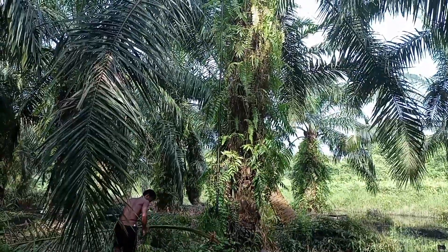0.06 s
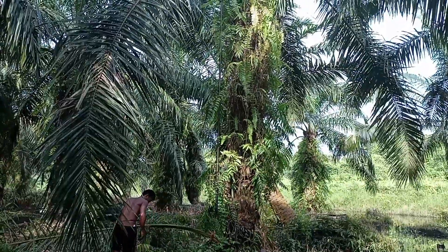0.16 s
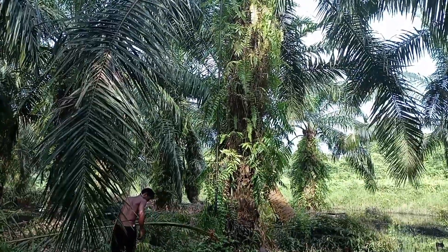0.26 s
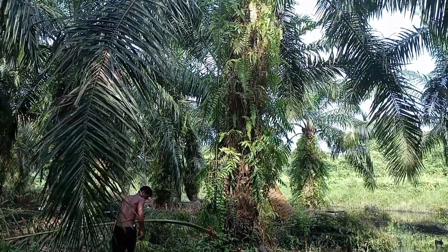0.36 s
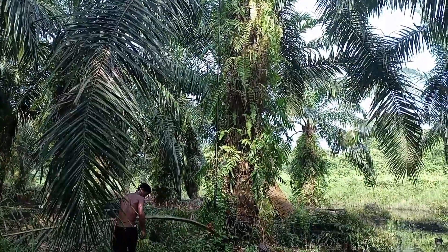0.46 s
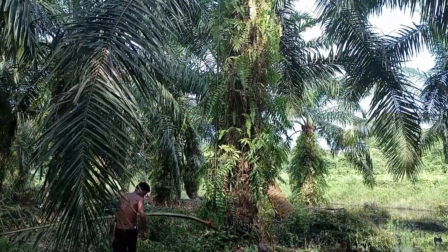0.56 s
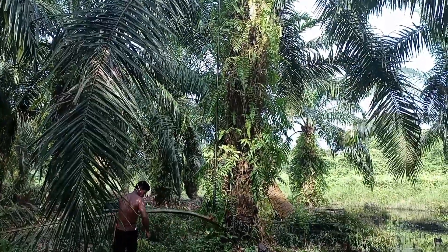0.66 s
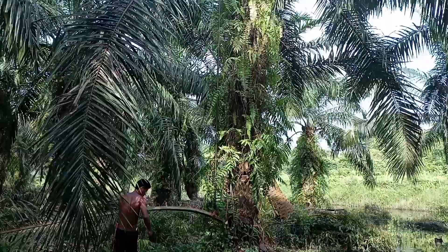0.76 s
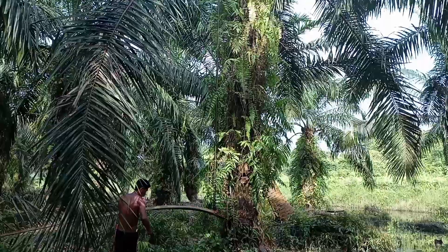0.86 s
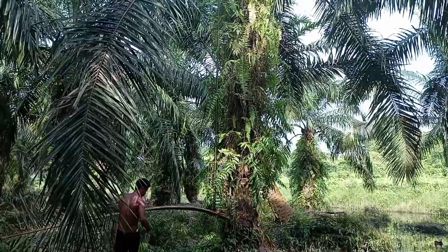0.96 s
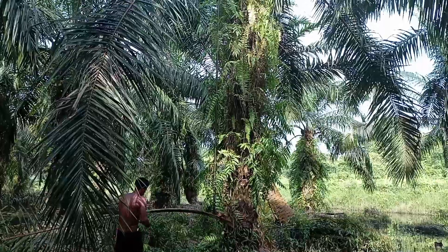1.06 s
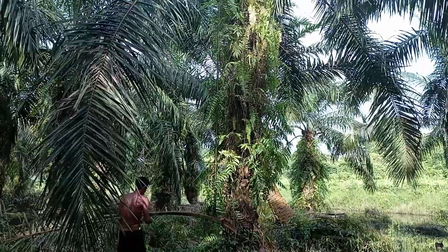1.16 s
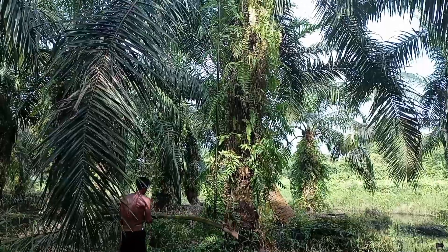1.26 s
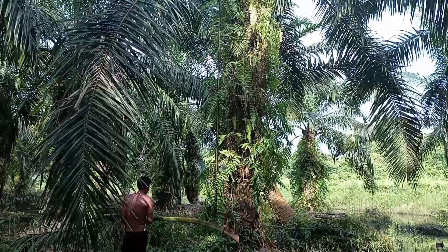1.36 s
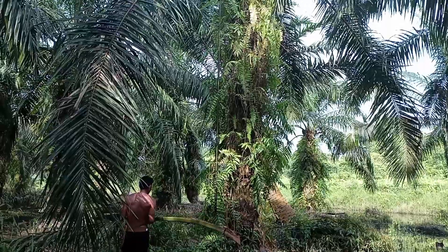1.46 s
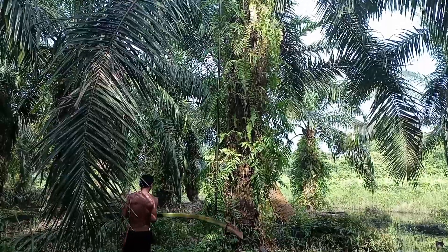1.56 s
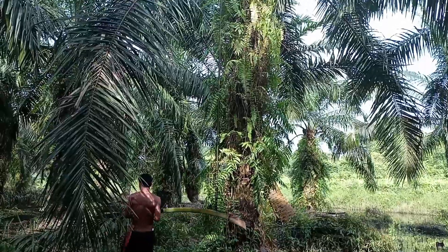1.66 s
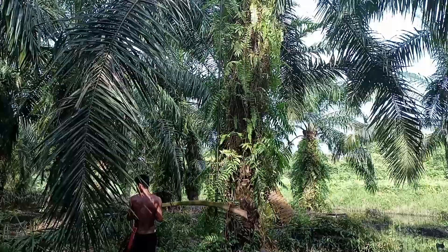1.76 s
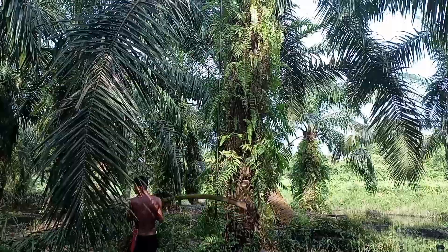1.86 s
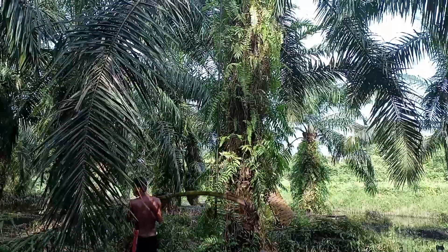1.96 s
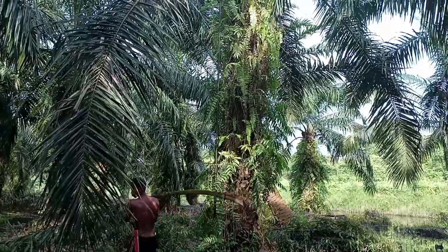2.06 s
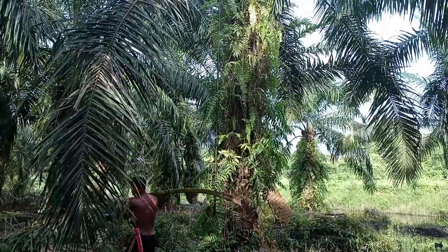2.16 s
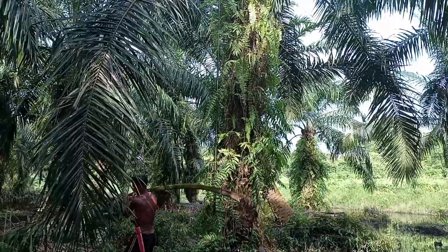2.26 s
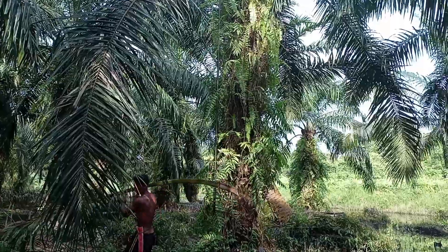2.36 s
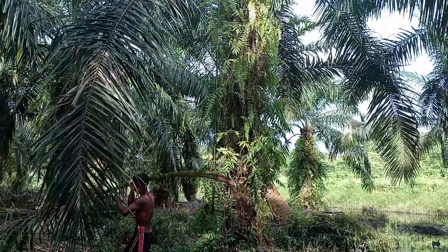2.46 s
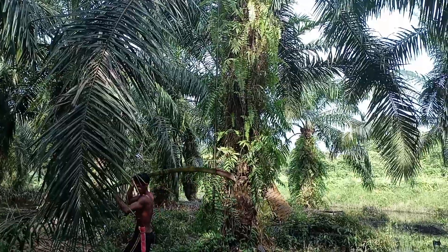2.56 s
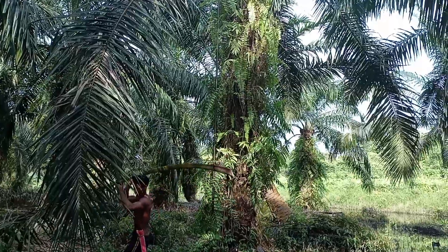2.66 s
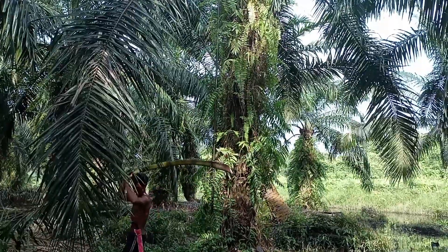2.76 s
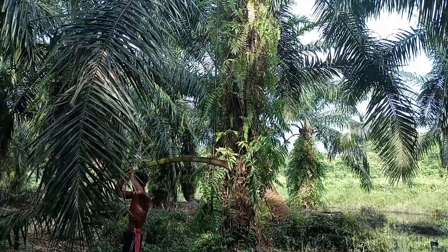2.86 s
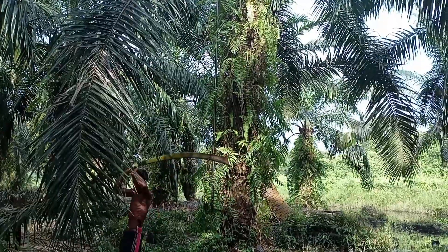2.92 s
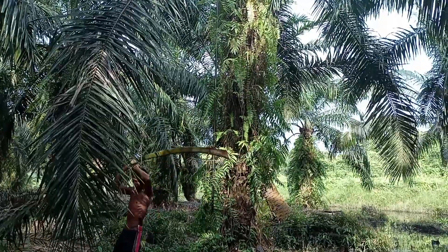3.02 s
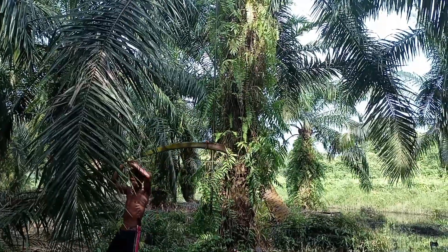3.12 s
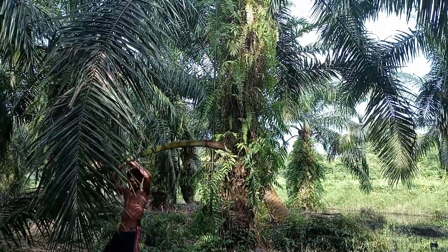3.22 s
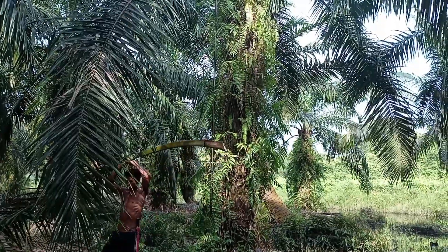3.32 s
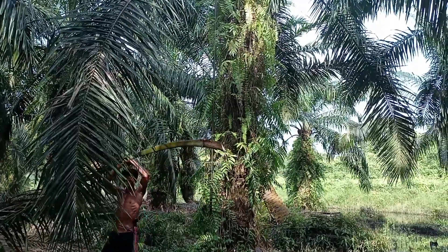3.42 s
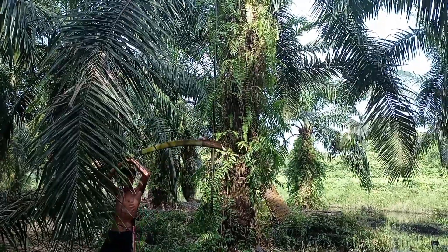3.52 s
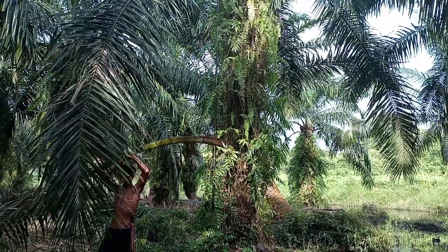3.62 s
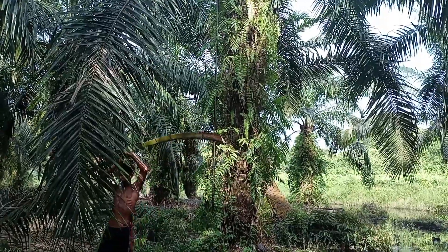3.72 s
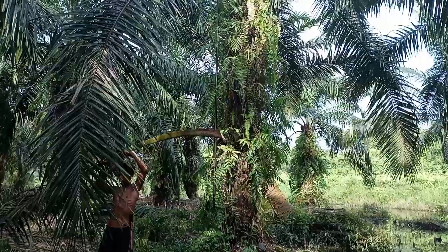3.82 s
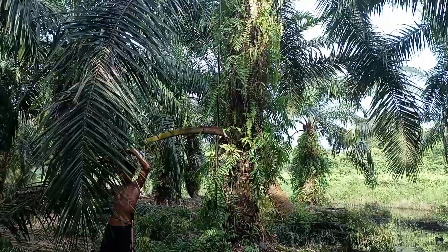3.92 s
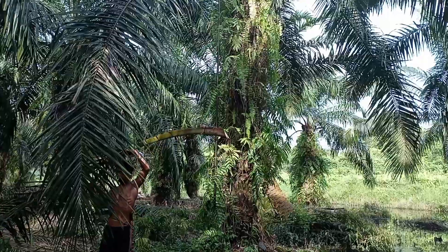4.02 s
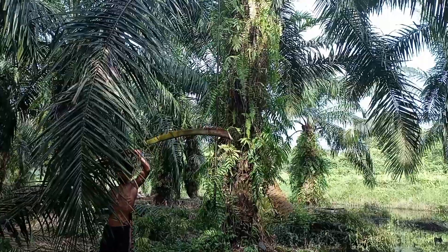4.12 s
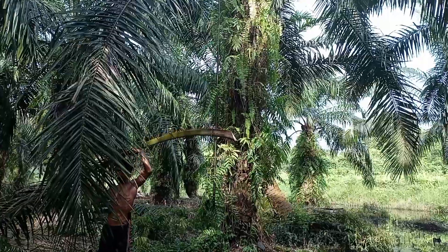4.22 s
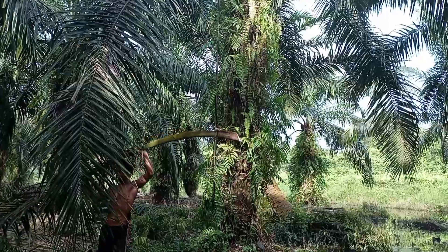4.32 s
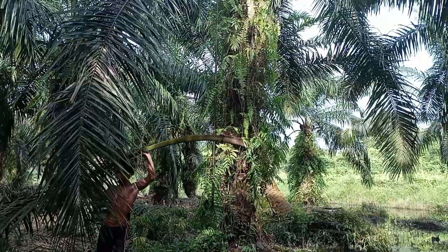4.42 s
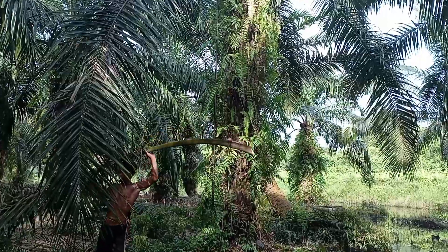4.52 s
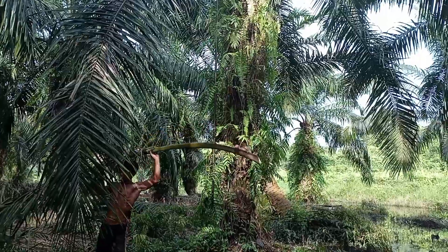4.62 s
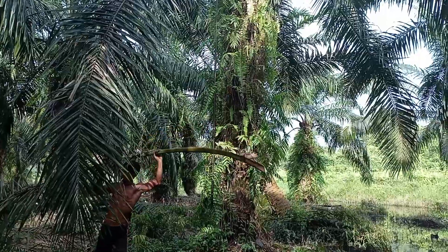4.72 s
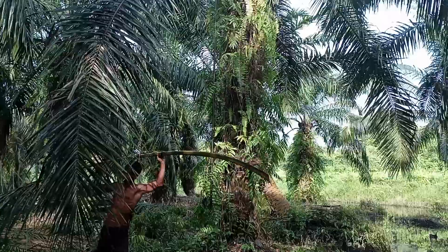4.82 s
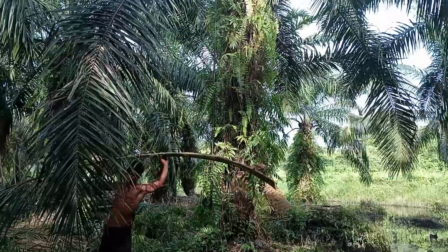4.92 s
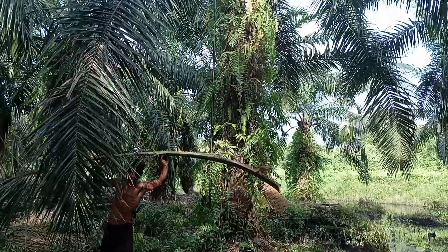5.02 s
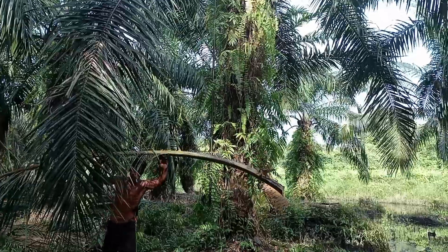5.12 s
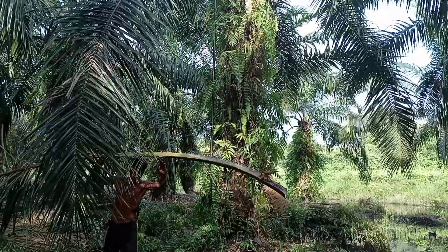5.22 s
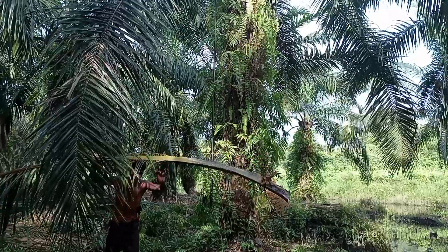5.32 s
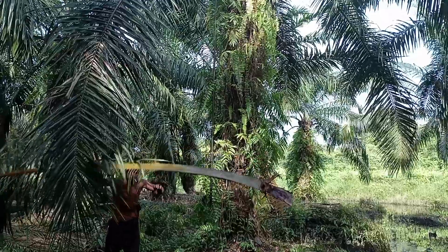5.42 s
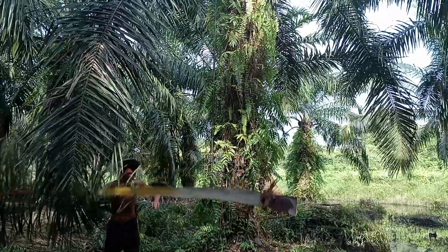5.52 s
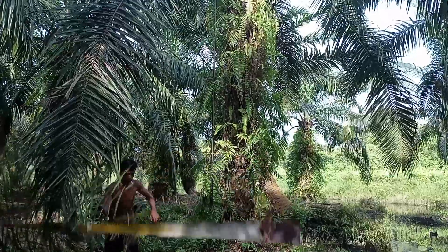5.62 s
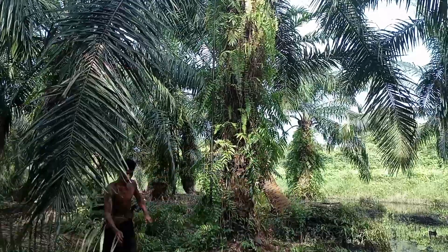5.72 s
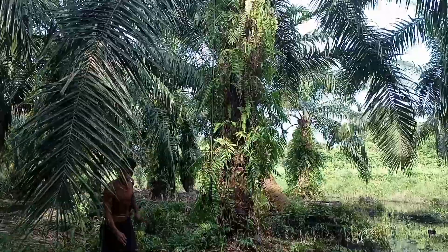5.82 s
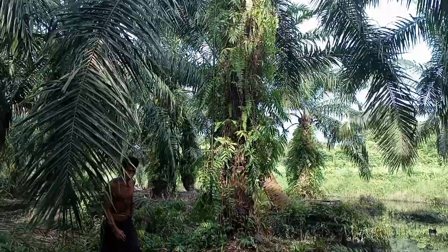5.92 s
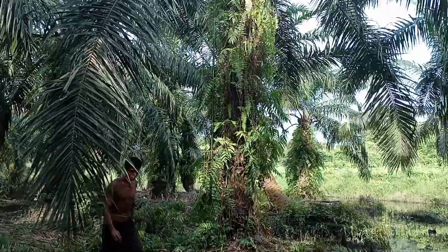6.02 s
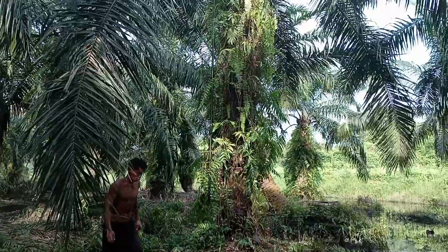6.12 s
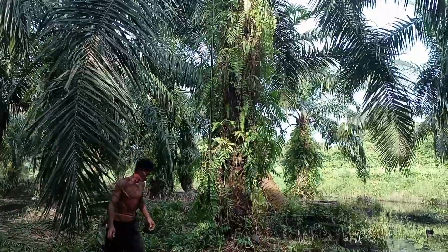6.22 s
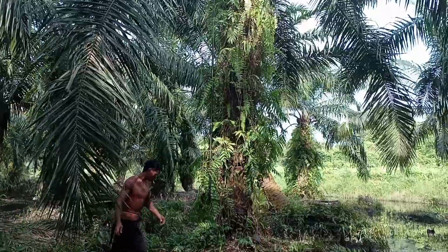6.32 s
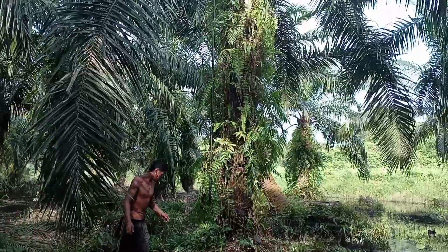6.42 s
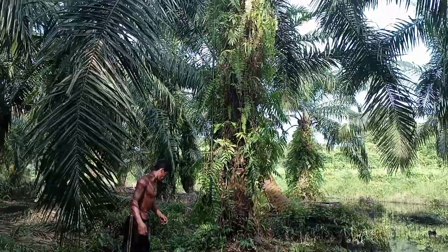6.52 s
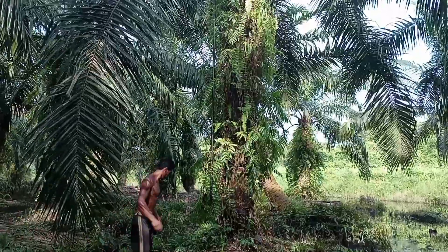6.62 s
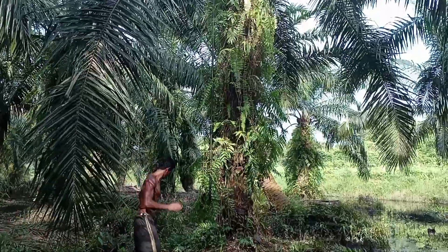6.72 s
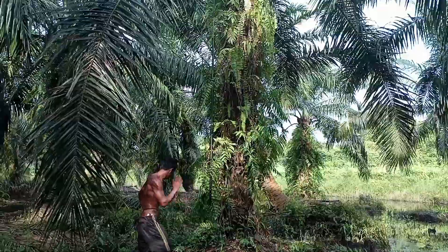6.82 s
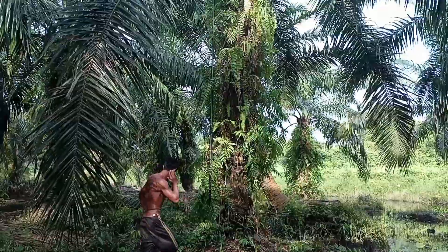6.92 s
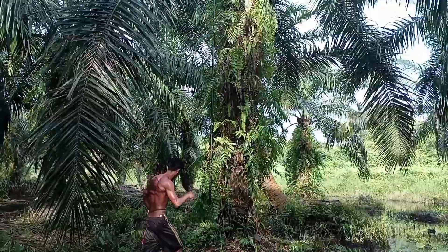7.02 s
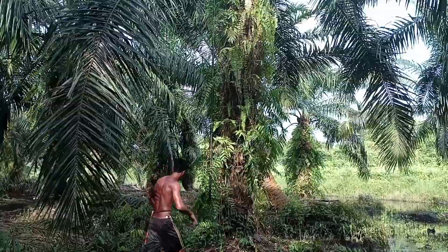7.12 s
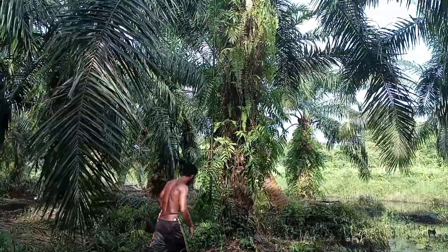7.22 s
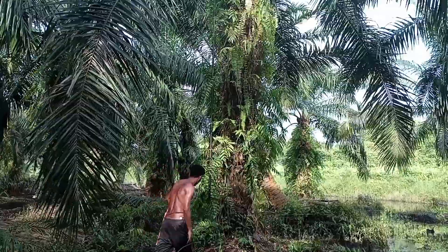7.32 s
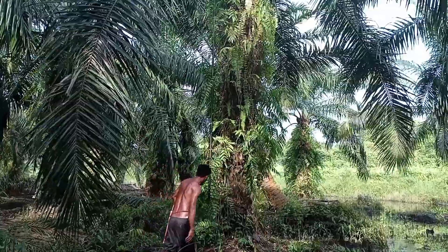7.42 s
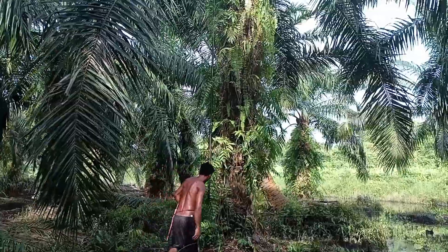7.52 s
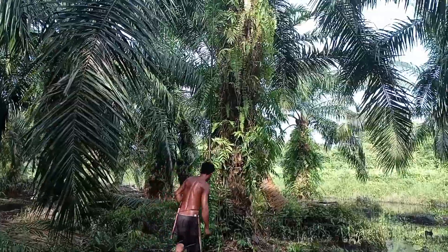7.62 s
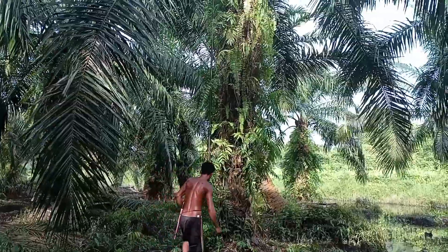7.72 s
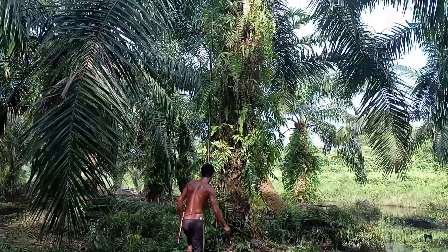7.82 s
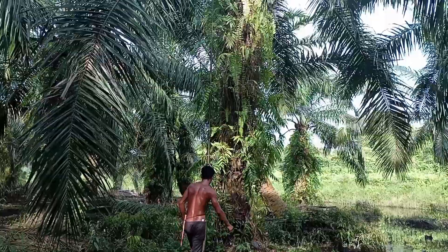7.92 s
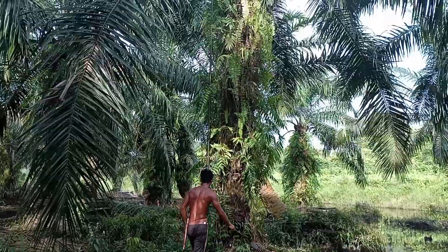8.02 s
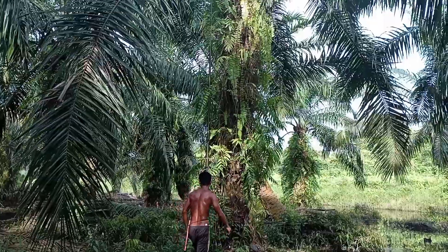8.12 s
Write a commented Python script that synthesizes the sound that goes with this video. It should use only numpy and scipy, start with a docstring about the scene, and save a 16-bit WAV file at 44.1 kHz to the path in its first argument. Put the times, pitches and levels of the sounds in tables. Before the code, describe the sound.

A worker drags and throws a big palm frond; leaflets rustle, twigs snap, it slams down crackling, amid steady insect hiss.

```python
"""Leaflets rustle, leaflets and twigs snap, a stalk knocks; a palm frond rushes down, cracks and thuds.
A worker in a plantation lifts the cut frond and throws it; insects hiss and an engine hums far away.
Leaves, air and insects are coloured noise and crackle; snaps and cracks are dying bursts of fractures.
Knocks ring damped modes of the stalk, thuds are low decaying swings, the engine is a few wandering tones.
"""
import sys
import numpy as np
from scipy import signal
from scipy.fft import rfft, irfft, next_fast_len
from scipy.io import wavfile

SR = 44100
rng = np.random.default_rng(int(sys.argv[2]) if len(sys.argv) > 2 else 0)


def transcribe(signal):
    """Save signal, clipped to [-1, 1], as a 16-bit WAV file at the path in sys.argv[1]."""
    frames = np.atleast_2d(signal).T
    limited = np.clip(frames, -1, 1)
    pcm = np.round(limited * 32767).astype(np.int16)
    wavfile.write(sys.argv[1], SR, pcm)


N = 360287
T = np.arange(N) / SR

# leaflets rubbing or slapping: (frequency [Hz], relative density [dB])
LEAF_SPECTRUM = [(150, -24), (600, -8.5), (1400, -6), (2400, 0.5), (4500, 4), (6500, 4.5), (9500, 6.5),
                 (12000, -21), (16000, 0)]
# crisp top of rubbing, snaps and cracks: (frequency [Hz], relative density [dB])
CRISP_SPECTRUM = [(500, -49), (4000, -21), (6500, -8), (8000, -3.5), (9800, 3.5), (11500, -4),
                  (13500, -8.5), (16000, -17.5)]
LANDING_S = 5.9225


def amp(db):
    """Decibels to gain."""
    return 10 ** (np.asarray(db) / 20)


def unit(x):
    """Scales to rms 1."""
    return x / np.sqrt(np.mean(x ** 2) + 1e-20)


def read(points, hz):
    """Reads a table on a log-frequency axis."""
    f, value = np.transpose(points)
    return np.interp(np.log(hz + 1), np.log(f + 1), value)


def since(s):
    """Seconds gone by since time s, zero before it."""
    return np.maximum(T - s, 0)


def add(mix, s, sound):
    """Mixes a sound in at time s."""
    part = mix[:, round(s * SR):][:, :sound.shape[-1]]
    part += sound[..., :part.shape[1]]


def pan(db):
    """Gains of left and right; positive favours the left."""
    return amp([[db / 2], [-db / 2]])


def drift(rate_hz):
    """Slow random motion of rms 1: noise under a Gaussian low-pass."""
    lowpass = np.exp(-(np.fft.rfftfreq(N, 1 / SR) / rate_hz) ** 2)
    return unit(irfft(rfft(rng.standard_normal(N)) * lowpass, N))


def colour(x, spectrum, size=4096):
    """Minimum-phase filter of energy 1, so that clicks keep their sharp fronts."""
    log_gain = np.log(amp(read(spectrum, abs(np.fft.fftfreq(size, 1 / SR)))))
    taps = np.fft.ifft(np.exp(np.conj(signal.hilbert(log_gain)))).real[:size // 2]
    taps /= np.linalg.norm(taps)
    return signal.oaconvolve(x, taps[None], axes=1)[:, :x.shape[1]]


def pair(x, likeness):
    """Blends two channels by frequency: long waves reach both ears more alike."""
    size = next_fast_len(x.shape[1])
    angle = np.arcsin(np.clip(read(likeness, np.fft.rfftfreq(size, 1 / SR)), 0, 1)) / 2
    z = rfft(x, size)
    return irfft(z * np.cos(angle) + z[::-1] * np.sin(angle), size)[:, :x.shape[1]]


def crackle(size, rate_hz, spread_db):
    """Random fractures of varying strength; the left ear hears each a little early, by its own delay."""
    at = np.flatnonzero(rng.random(size) < rate_hz / SR)
    strength, sign, place, side = rng.random((size, 4))[at].T
    click = amp(spread_db * np.minimum(-np.log(1 - strength), 5)) * np.sign(sign - .5)
    delay = (place * 20).astype(int)  # samples
    out = np.zeros((2, size))
    out[0, at] = click * (.5 + side)
    out[1, np.minimum(at + delay, size - 1)] = click * (1 + .5 - side)
    return unit(out)


def tear(length_s, rate_hz=11000, spread_db=1.0):
    """A dying burst of breaking fibres; a longer tear carries more energy."""
    t = T[:round(length_s * 8 * SR) + 32]
    burst = crackle(len(t), rate_hz, spread_db) * np.exp(-t / length_s)
    burst /= np.linalg.norm(burst, axis=1, keepdims=True).clip(1e-9)
    return burst * np.sqrt((0.0015 + length_s / 2) * SR)


def ticks(size, rate_hz, spread_db, low_hz=2250, high_hz=13600, count=30):
    """Single leaflets or twigs flick past each other: crackles on brief rings of many pitches."""
    t, out = T[:256], np.zeros((2, size))
    for hz, cycles in zip(np.linspace(low_hz, high_hz, count), rng.uniform(0.96, 5.2, count)):
        ring = unit(np.exp(-t * hz / cycles) * np.sin(2 * np.pi * hz * t))
        out += signal.oaconvolve(crackle(size, rate_hz, spread_db), ring[None], axes=1)[:, :size]
    return unit(out)


def background():
    """Still air and a dense insect chorus as coloured noise; a distant engine as wandering tones."""
    # still air and insect chorus: (frequency [Hz], relative density [dB])
    air_spectrum = [(20, -52.5), (45, -14), (75, -4), (140, -2), (280, -9), (500, -14.5), (1000, -24.5),
                    (2000, -21), (4400, -22), (6000, -34), (16000, -24)]
    insect_spectrum = [(4000, -51), (6300, -29), (7200, -12), (7650, -3), (8050, -1.5), (8350, -7.5),
                       (8750, -17.5), (9400, -9.5), (10000, -8.5), (10600, -17), (12000, -42), (16000, -25)]
    # likeness of the two ears for the air: (frequency [Hz], likeness [0-1])
    far_likeness = [(60, 0.46), (130, 0.37), (300, 0.15), (700, 0.15), (1500, 0.027), (15000, .05)]
    # steady engine tones: (frequency [Hz], level before swell [dB], share of swell [0-1], rms wander [Hz])
    engine_tones = [(53.2, -73, 0, 0.32), (83.3, -73, 1, 0.48), (106, -71, 0.83, 0.5), (134, -82, 0, 0.46),
                    (150.4, -79, 0.4, 0.6)]
    # the far engine swells and fades: (time [s], level change [dB])
    engine_swell = [(0, -11), (.8, -0.5), (3.4, -4.5), (4.4, 3.5), (5.6, 4), (6.8, 8.5), (7.4, 3.5),
                    (8.1, 3)]
    air = amp(-65) * pair(colour(rng.standard_normal((2, N)), air_spectrum), far_likeness)
    chorus_db = -54.5 + np.interp(T, [0, 4, 7, 8.1], [-1.5, -0.073, 0.64, 0.077])
    chorus_db += 1.17 * drift(0.91) + 0.51 * drift(60)
    insects = amp(chorus_db) * colour(rng.standard_normal((2, N)), insect_spectrum) * pan(-4.5)
    swell_db = np.interp(T, *np.transpose(engine_swell))
    engine = np.zeros(N)
    for hz, db, share, wander_hz in engine_tones:
        level_db = db + share * (swell_db + 0.88 * drift(4.8))
        phase = 2 * np.pi * np.cumsum(hz + wander_hz * drift(5.5)) / SR
        engine += amp(level_db) * np.sqrt(2) * np.sin(phase)
    return air + insects + engine


def motions():
    """Each way the leaves move, as (strength over time, crisp top [dB], dull drag [dB])."""
    # rubbing as the frond is dragged, lifted and held: (time [s], level before handling_db [dB])
    handling = [(0.0, -62), (0.31, -68.5), (0.52, -68), (0.84, -60.5), (1.39, -63.5), (1.78, -62),
                (2.22, -66.5), (2.86, -63.5), (3.05, -62), (3.22, -60), (3.70, -69.5), (3.97, -69),
                (4.63, -59), (4.96, -60), (5.15, -58.5), (5.28, -63.5), (5.5, -63.5)]
    # jerks and footsteps shake the leaves: (time [s], level [dB], fade [s], relative crisp top [dB])
    shake_events = [(0.476, -60, 0.088, 6), (.68, -57.5, 0.21, 7.5), (1.75, -56, 0.15, -1),
                    (1.865, -66.5, 0.16, 14.5), (2.188, -53, 0.06, 5.5), (2.41, -61, .03, 2),
                    (2.86, -50, 0.098, 4.5), (3.57, -59.5, 0.05, 1), (3.975, -62, 0.022, 0),
                    (4.14, -66, 0.051, 11.5), (4.465, -54.5, 0.065, -3), (5.503, -63, .06, 8),
                    (5.71, -59, 0.053, 12), (5.868, -53.5, 0.055, 12), (6.145, -53, 0.069, -2),
                    (6.29, -51, 0.023, -4), (6.37, -62, .05, 4), (6.505, -54.5, 0.06, -2),
                    (6.575, -60, 0.024, -10), (6.81, -65.5, 0.053, 3), (7.4, -61, 0.16, 1),
                    (7.535, -65, 0.065, -8), (7.81, -71, .05, -3), (8.135, -68, .08, 6)]
    handling_db, throw_s, let_go_s, flat_s, shake_rise_s = 1.2, 5.495, 0.27, 6.31, 0.011
    held = amp(np.interp(T, *np.transpose(handling)) + handling_db) * np.exp(-since(throw_s) / let_go_s)
    # the raised frond sweeps through the hanging crown, a duller swell
    lift = amp(-65) * np.exp(-((T - 4.55) / 0.47) ** 2)
    down = T >= LANDING_S
    # the rush grows with the speed of the falling frond
    rush = amp(-50) * (since(throw_s) / (LANDING_S - throw_s)) ** 0.53 * ~down
    # the lowest leaflets meet the weeds, strongest at the landing
    graze = amp(-45) * np.exp(-abs(T - LANDING_S) / .03)
    # the frond sags until it lies flat; some leaflets go on creeping
    sag = amp(-42.5 - 27 * since(LANDING_S) - 83 * since(flat_s)) * down
    creep = amp(-48 - 26.5 * since(LANDING_S)) * down
    ways = [(held, 2.5, -7.5), (lift, 0, -0.5), (rush, 7, -6),
            (graze, 2, -17), (sag, 5.5, -9.5), (creep, 4.5, -9.5)]
    for s, db, fade_s, crisp_db in shake_events:
        rise = np.minimum(since(s) / shake_rise_s, 1)
        ways.append((amp(db) * rise * np.exp(-since(s + shake_rise_s) / fade_s), crisp_db, -10))
    return ways


def from_left(x, share=0.13, lead_s=.00042):
    """Part of the sound comes straight from the left and reaches the right ear a little later."""
    direct = np.roll(x[0], round(lead_s * SR))
    return np.array([x[0], share * direct + np.sqrt(1 - share ** 2) * x[1]])


def flutter(x, depth_db, width_hz, length_s, size=512):
    """Brief random patches of the spectrum swell and fade, which makes the hiss uneven."""
    overlap = size * 3 // 4
    z = signal.stft(x, nperseg=size, noverlap=overlap)[2]
    across_hz = np.fft.fftfreq(z.shape[1], SR / size)[:, None]
    across_time = np.fft.fftfreq(z.shape[2], size / 4 / SR)
    smooth = np.exp(-(across_hz * width_hz) ** 2 - (across_time * length_s) ** 2)
    patches = unit(np.fft.ifft2(np.fft.fft2(rng.standard_normal(z.shape[1:])) * smooth).real)
    y = signal.istft(z * amp(depth_db * patches), nperseg=size, noverlap=overlap)[1]
    return unit(y[:, :x.shape[1]])


def rustle():
    """Countless leaflets rub into a hiss with flicks and dry crackle; the frond drags in undergrowth."""
    # dull drag through undergrowth: (frequency [Hz], relative density [dB])
    brush_spectrum = [(30, -32), (100, -7.5), (160, 0.5), (215, -2), (295, 0.5), (410, -10.5), (560, -8.5),
                      (750, -8.5), (1150, -28), (4000, -19.5)]
    # powers of all motions add, in three layers
    power = sum((amp([[0], [crisp_db], [drag_db]]) * strength) ** 2
                for strength, crisp_db, drag_db in motions())
    body, top, low = np.sqrt(power)
    rubbing = unit(rng.standard_normal((2, N)) + 0.44 * ticks(N, rate_hz=70, spread_db=0.0))
    rubbing = flutter(from_left(rubbing), depth_db=1.9, width_hz=260, length_s=.03)
    rubbing = unit(rubbing + .33 * crackle(N, rate_hz=220, spread_db=2.0))
    rubbing = rubbing * amp(0.49 * drift(10))
    blades = flutter(rubbing, depth_db=2.4, width_hz=180, length_s=.014)
    leaves = colour(blades * body * amp(5.0), LEAF_SPECTRUM)
    tips = colour(rubbing * top * amp(5.0 + 1.04 * drift(10.0)), CRISP_SPECTRUM)
    low = np.hypot(low, amp(-76))  # constant dull stir of weeds around the worker's legs
    drag = colour(rng.standard_normal((2, N)) * low * amp(2.7 * drift(15.0)), brush_spectrum)
    return (leaves + tips) * pan(0.089) + drag


def snaps(q=4.5):
    """Dry leaflets and twigs snap: each breaks in a short tear, with a brief pitched ring."""
    # dry leaflets and twigs snapping: (time [s], level [dB], tear decay [s], relative ring [dB],
    # ring frequency [Hz], tear pitch [Hz], relative sharp top [dB])
    snap_events = [(0.156, -48, .002, -20, 4000, 9900, 0), (0.6676, -28.5, 0.0038, -30, 6000, 9050, 12),
                   (0.7567, -38.5, 0.0017, -17, 5000, 9600, -6), (0.97, -43.5, 0.0037, -16, 3480, 9800, -6),
                   (1.495, -54, .005, -2, 3800, 9600, -3), (1.864, -32.5, 0.0014, -24, 4950, 10400, 8),
                   (1.874, -38, .004, -24, 4950, 10300, 6), (2.195, -39, .001, -21, 4500, 10500, 3),
                   (2.1982, -31, 0.0015, -23, 4500, 10500, 5), (2.861, -29, 0.0062, -14, 3820, 9900, -6),
                   (3.577, -47, 0.0067, -17, 4000, 9800, -3), (3.985, -49, .002, -18, 4500, 9800, 0),
                   (4.386, -46.5, .003, -6, 4200, 9800, -3), (4.448, -35, 0.0012, -7, 4300, 9800, -2),
                   (4.63, -44.5, .002, -5, 4000, 9800, -2), (5.873, -34, 0.0025, -16, 4500, 10000, -2),
                   (6.1468, -20.5, 0.0014, -28, 7000, 8800, 8), (6.157, -31, .002, -20, 5970, 9300, 2),
                   (6.254, -27, 0.0025, -19, 4500, 9300, -7), (6.307, -33, .001, -22, 4000, 9800, 2),
                   (6.325, -33.5, 0.0014, -22, 4950, 10100, -2),
                   (6.3506, -37, 0.0018, -20, 4970, 10200, -4), (6.467, -41.5, 0.0047, -16, 4300, 9700, -2),
                   (6.494, -36, .0008, -24, 5000, 10600, 0), (6.503, -22.5, 0.0022, -12.5, 5270, 9550, -3),
                   (6.587, -44, 0.0076, -25, 4500, 10000, 3), (6.599, -49.5, 0.0033, 3.5, 5430, 9800, -2),
                   (6.62, -42.5, 0.0046, -6, 3100, 9600, -3), (6.8127, -46.5, 0.0012, -9, 2100, 9000, -2),
                   (6.814, -55, .001, -3, 3500, 9300, -4), (7.3, -48.5, .001, -26, 5000, 9900, 3),
                   (7.371, -56.5, 0.0016, 2, 3900, 9800, 2)]
    average_hz, top_hz = 9660, 13400  # the sharp top is weighted in around top_hz, before the pitch shift
    out, t = np.zeros((2, N)), T[:256]
    for s, db, length_s, ring_db, ring_hz, pitch_hz, top_db in snap_events:
        burst = amp(db) * pan(.8) * tear(length_s, rate_hz=16000, spread_db=.5)
        burst = np.pad(burst, ((0, 0), (0, 512)))  # room for the filter's tail
        ring = np.exp(-np.pi * ring_hz * t / q) * np.cos(2 * np.pi * ring_hz * t)
        ring /= np.linalg.norm(ring)
        spectrum = [(hz * pitch_hz / average_hz, level_db + top_db / (1 + (top_hz / hz) ** 10))
                    for hz, level_db in CRISP_SPECTRUM]
        add(out, s, colour(burst, spectrum))
        add(out, s, amp(ring_db) * signal.fftconvolve(burst, ring[None], axes=1))
    return out


def grove(x, t60_s=0.37):
    """Trunks and crowns scatter a thin tail: sparse random echoes under a decay."""
    t = T[:SR]
    tail = rng.standard_normal((2, SR)) * (rng.random((2, SR)) < 4000 / SR)
    tail *= amp(-60 * t / t60_s) * (1 - np.exp(-t / 0.0029))
    return signal.fftconvolve(x, tail / np.linalg.norm(tail[0]), axes=1)[:, :N]


def knocks(give_s=0.00099, detune=0.046):
    """A cushioned blow and short scrape ring the stalk's modes; each spot favours and shifts some."""
    # hollow knocks of the stalk and dead stalks underfoot: (time [s], level [dB],
    # favoured frequency [Hz], scrape decay [s], reach of the ring [octaves])
    knock_events = [(0.48, -60, 750, 0.0066, 1), (0.493, -57.5, 760, 0.0033, .7),
                    (0.698, -70, 744, 0.4, 0.97), (0.9446, -45.5, 930, 0.001, 0.75),
                    (.948, -52, 825, 0.0012, 0.61), (0.972, -64, 1000, .008, 1.2),
                    (1.111, -61.5, 565, 0.0078, 0.44), (1.287, -52, 780, 0.00075, 0.38),
                    (1.633, -66, 720, .006, 0.91), (1.773, -62, 806, 0.018, 0.64),
                    (1.792, -59.5, 860, 0.019, 0.45), (1.824, -58.5, 760, 0.0046, 0.42),
                    (2.551, -64, 630, 0.0048, 0.83), (2.577, -68, 600, .02, 0.67),
                    (2.774, -66, 554, 0.0054, 0.27), (2.835, -49, 1060, 0.0045, 0.58),
                    (2.905, -59, 650, 0.027, 1.2), (3.239, -66.5, 1300, 0.017, .5),
                    (3.575, -62, 950, 0.002, 0.9), (3.582, -55, 640, 0.003, 0.6),
                    (4.796, -58.5, 750, 0.004, .6), (5.927, -37, 650, 0.006, 0.82),
                    (5.9358, -39.5, 720, 0.0056, .8), (6.032, -46.5, 755, 0.0043, 1.1),
                    (6.077, -59, 800, 0.0027, 1.1), (6.137, -53, 1700, 0.0044, 0.36),
                    (6.2516, -49, 700, 0.0049, 1.1), (6.307, -55, 794, 0.01, 1.1),
                    (6.327, -61, 1700, .003, 0.35), (6.377, -64, 800, .003, 1.5),
                    (6.503, -50, 1730, .003, 0.34), (6.506, -55.5, 597, 0.0025, .5),
                    (7.421, -66, 750, 0.016, 1.4), (7.504, -66.5, 850, .006, 1.4),
                    (7.552, -67, 700, 0.013, 1.2), (7.581, -69, 705, 0.01, 1.3),
                    (8.124, -57, 730, 0.0008, 0.22)]
    # modes of the stalk: (frequency before shift [Hz], relative level [dB], t60 at reference reach [s])
    stalk_modes = [(490, -2, 0.014), (610, 4.5, 0.021), (722, 8, 0.02), (966, 8, 0.013), (1166, 8.5, 0.016),
                   (1270, 9.5, 0.021), (1630, 6.5, 0.016)]
    even_scrape_s = 0.0057  # a scrape this long is as strong as its blow
    reference_reach, reach_power = 0.69, 0.67  # a narrower spot rings longer
    out, t = np.zeros((2, N)), T[:SR // 10]
    shifts = 1 + detune * rng.uniform(-1.64, 1, (len(knock_events), len(stalk_modes)))
    for (s, db, centre_hz, length_s, reach), shift in zip(knock_events, shifts):
        damping = (reach / reference_reach) ** reach_power
        ring = np.zeros(len(t))
        for (hz, level_db, t60_s), k in zip(stalk_modes, shift):
            favour = 1 / (1 + (np.log2(hz / centre_hz) / reach) ** 2) ** 2
            ring += favour * amp(level_db - 60 * t / t60_s * damping) * np.sin(2 * np.pi * hz * k * t)
        ring *= 1 - np.exp(-t / give_s)
        force = tear(length_s)
        force *= length_s / even_scrape_s / np.linalg.norm(force[0])
        force[:, 0] += 1  # the blow
        knock = signal.fftconvolve(force, ring[None], axes=1)
        knock /= np.linalg.norm(knock.mean(0))
        add(out, s, amp(db) * knock * np.sqrt((0.0021 + length_s / 2) * SR))
    return signal.sosfilt(signal.butter(4, 430, "high", fs=SR, output="sos"), out)


def thuds(rise_s=0.00033, below=0.75, above=1.9):
    """Low thumps: a few decaying swings, then a dying jumble of smaller bumps around that pitch."""
    # two short low thumps, probably the microphone being handled, then the frond landing and rocking
    # on soft ground: (time [s], level before +2.5 dB and high-pass [dB], frequency [Hz], t60 [s],
    # decay of the smaller bumps [s])
    thud_events = [(3.985, -33.5, 116, 0.011, 0.0011), (3.9988, -36, 120, 0.014, 0.0007),
                   (5.9252, -23.5, 132, 0.056, 0.0047), (5.9398, -25.5, 185, 0.03, 0.0046),
                   (5.965, -36, 265, .06, 0.019), (6.05, -45.5, 205, 0.09, 0.018),
                   (6.14, -54, 248, .1, .06), (6.2524, -35, 275, 0.036, 0.004),
                   (6.312, -53, 240, .04, .006)]
    even_bumps_s = 0.021  # bumps that last this long are as strong as the blow
    out, t = np.zeros((2, N)), T[:SR // 4]
    for s, db, hz, t60_s, length_s in thud_events:
        swing = amp(db + 2.5 - 60 * t / t60_s) * (1 - np.exp(-t / rise_s)) * np.sin(2 * np.pi * hz * t)
        band = signal.butter(2, [hz * below, hz * above], "band", fs=SR, output="sos")
        jumble = crackle(len(t), rate_hz=1800, spread_db=0.5)[0] * np.exp(-t / length_s)
        bumps = signal.sosfilt(band, jumble)
        bumps *= np.linalg.norm(swing) / np.linalg.norm(bumps)
        add(out, s, swing)
        add(out, s + .5 / hz, np.sqrt(length_s / even_bumps_s) * bumps)
    return signal.sosfilt(signal.butter(2, 88, "high", fs=SR, output="sos"), out)


def landing():
    """The rib cracks, splits and clatters; hundreds of leaflets slap down in clumps, stragglers follow."""
    # the rib strikes tip first and slaps down again: (time after landing [s], level before layer gains [dB],
    # decay [s], relative splitting wood [dB])
    crack_events = [(-.0016, -19, 0.00065, -18), (.0003, -11, 0.0022, -21), (.0016, -12, 0.0038, -23),
                    (0.016, -32, 0.002, -1), (0.022, -35, .0015, 3.5), (.028, -34, .0015, -4),
                    (0.043, -29, .002, -13)]
    # splitting wood and clattering body: (frequency [Hz], relative density [dB])
    split_spectrum = [(200, -23), (700, -12), (1100, -7), (1500, 0), (2100, 0), (2700, 2), (3400, -12),
                      (5000, -11), (12000, -33)]
    clatter_spectrum = [(30, -22), (75, -20), (120, -7.5), (260, 0.5), (390, -11.5), (490, -9), (620, -16),
                        (790, -10), (1100, -20), (1600, -22), (2600, -18), (5000, -11), (12000, -19.5)]
    crack, split, slap, late, crushed = np.zeros((5, 2, N))
    t = T[:SR]
    for after_s, db, length_s, wood_db in crack_events:
        burst = amp(db) * tear(length_s, rate_hz=32000, spread_db=-1)
        add(crack, LANDING_S + after_s, burst)
        add(split, LANDING_S + after_s, amp(wood_db) * burst)
    slaps = crackle(len(t), rate_hz=7000, spread_db=1.8)
    add(slap, LANDING_S, slaps * np.exp(-t / 0.04) * (1 - np.exp(-t / 0.0024)))
    slap *= amp(1.4 * drift(120)) * np.minimum(since(LANDING_S) / 0.012, 1)
    add(late, LANDING_S, ticks(len(t), rate_hz=4.9, spread_db=-3.0) * np.exp(-t / 0.17))
    # stems and weeds crushed under the frond
    add(crushed, LANDING_S, crackle(len(t), rate_hz=160, spread_db=2.5) * np.exp(-t / 0.18))
    bright = colour(crack + amp(-19.0) * slap, CRISP_SPECTRUM)
    dull = colour(amp(-13) * crack + amp(-23.0) * slap + amp(-45) * late, LEAF_SPECTRUM)
    body = colour(amp(-22) * crack + amp(-31) * slap + amp(-49.0) * crushed, clatter_spectrum)
    crunch = colour(split + amp(-39.5) * slap, split_spectrum)
    return (bright + dull) * pan(0.5) + body + crunch


def settling():
    """Dry twigs and litter crackle coarsely, in uneven clumps, as they take the weight of the frond."""
    twigs = ticks(N, rate_hz=20, spread_db=1.2, low_hz=1400, high_hz=6000)
    clumps = unit(amp(5 * np.clip(drift(20), -2, 2)))
    level_db = -48.5 - 27.5 * since(LANDING_S) - 90 * since(6.55)  # fades faster from 6.55 s
    return twigs * clumps * amp(level_db) * (T >= LANDING_S)


def scene():
    """The frond among the palms."""
    # likeness of the two ears for near sounds: (frequency [Hz], likeness [0-1])
    near_likeness = [(200, 0.9), (600, 0.61), (1200, 0.022), (3000, 0.019), (15000, 0.022)]
    breaks, fall, wood = snaps(), landing() + settling(), knocks()
    echo = grove(amp(-10.0) * breaks + amp(-9.0) * fall + amp(-8) * wood)
    return pair(rustle() + breaks + fall + wood + echo, near_likeness) + thuds() + background()


def record(dry, ceiling=.95):
    """A soft limit rounds off the very loudest peaks; then a low-pass limits the band."""
    rounded = dry / (1 + (dry / ceiling) ** 4) ** (1 / 4)
    taps = signal.firwin(301, 15750, window=("kaiser", 8), fs=SR)
    return signal.oaconvolve(rounded, taps[None], "same", axes=1)


dry = scene()
out = record(dry)
transcribe(out)
```